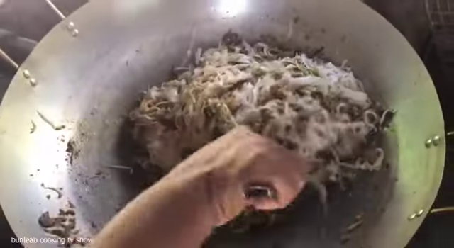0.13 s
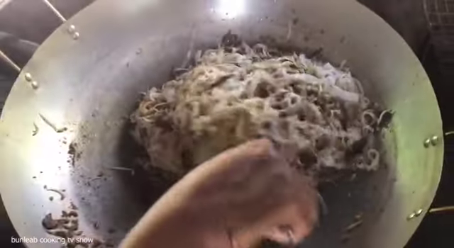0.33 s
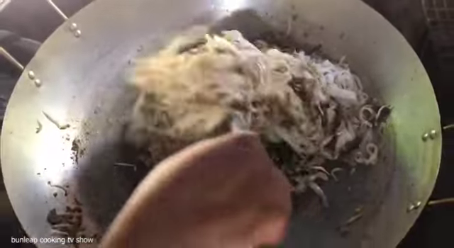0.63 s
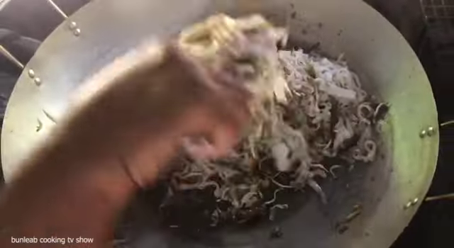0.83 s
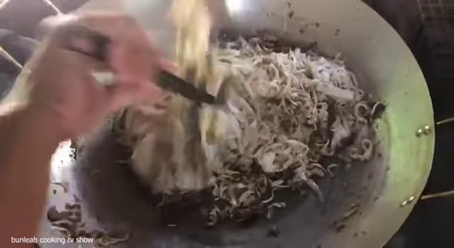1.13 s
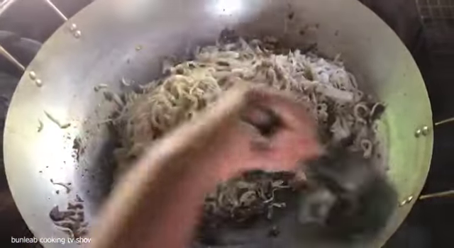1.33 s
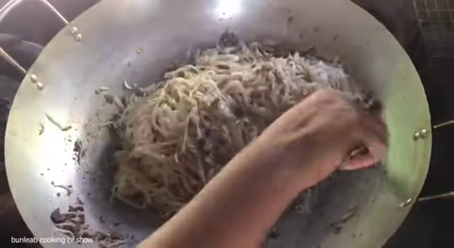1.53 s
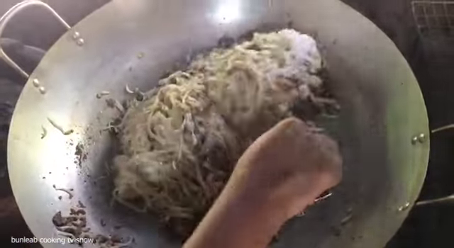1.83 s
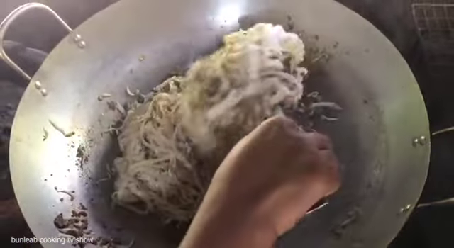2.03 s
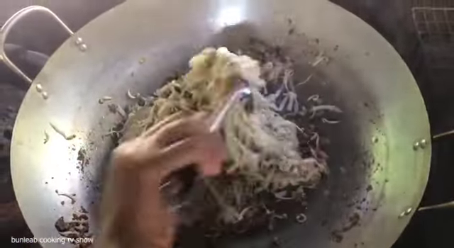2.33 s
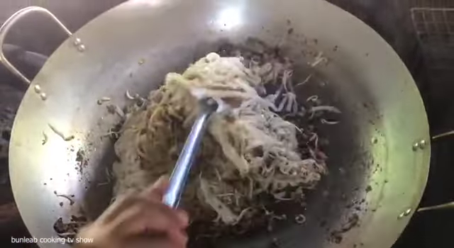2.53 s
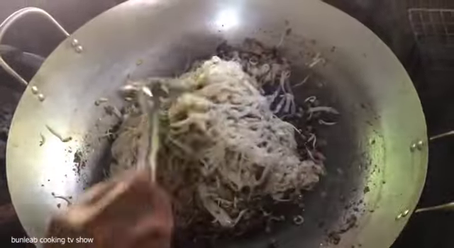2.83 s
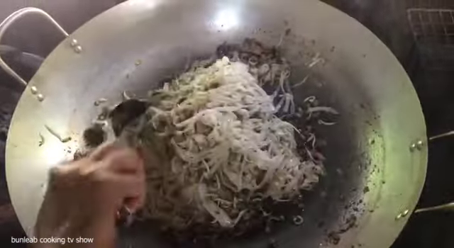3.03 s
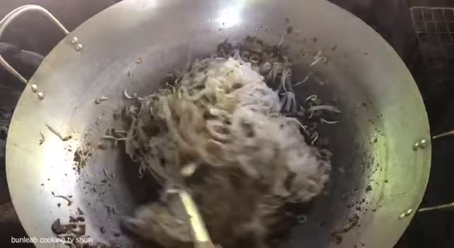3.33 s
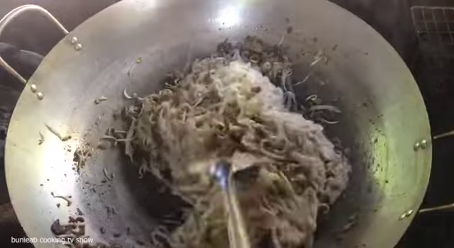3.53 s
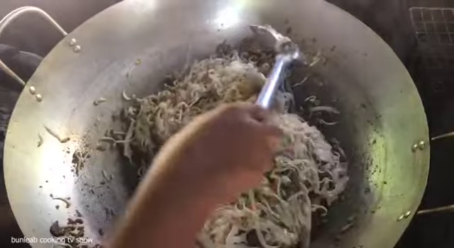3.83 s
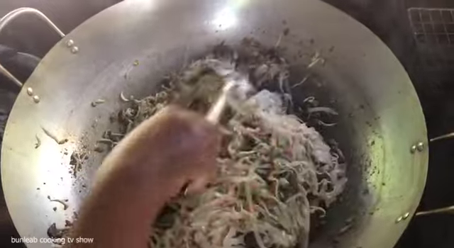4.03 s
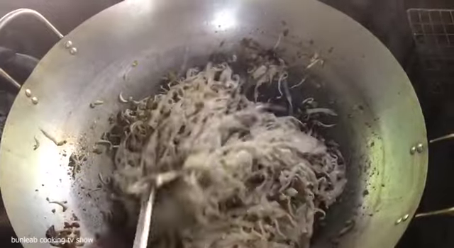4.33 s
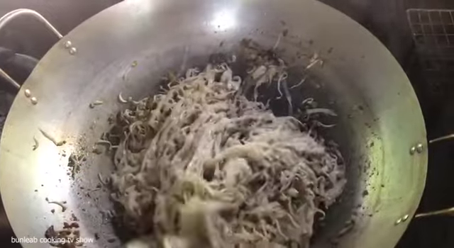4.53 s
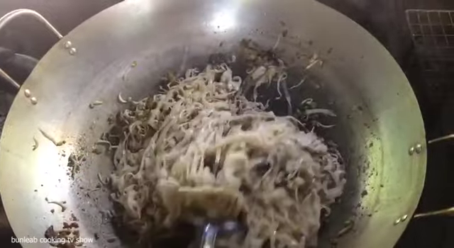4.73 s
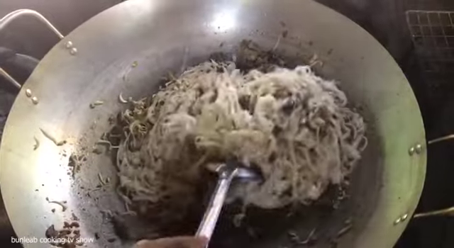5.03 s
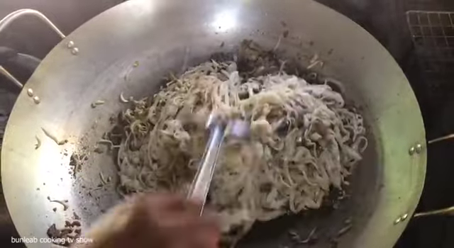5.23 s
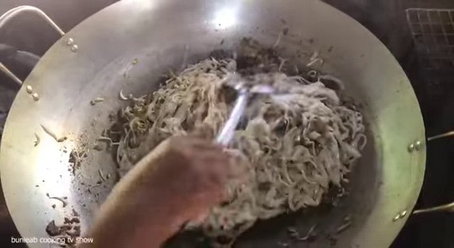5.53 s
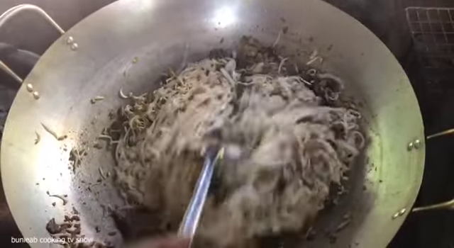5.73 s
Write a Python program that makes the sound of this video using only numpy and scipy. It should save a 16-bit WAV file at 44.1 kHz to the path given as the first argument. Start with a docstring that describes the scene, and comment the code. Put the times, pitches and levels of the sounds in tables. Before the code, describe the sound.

A metal spatula rasps briefly over a wok, noodles flop, and the wet frying swells with each turn. A sharp snag, groaning bowl and squealing scrape come next, later two loud, quickly damped clanks, the strongest sizzle surge just after the first. Then only sizzling and rustling remain. Faint burner rumble, fat ticks and four thin falling peeps lie behind; close, dry, mono, slightly dull at the top.

```python
"""Frying in a large metal wok

Noodles and minced meat sizzle (shaped noise and ringing steam bubbles) over a softly rumbling burner.
A metal spatula scrapes (stick-slip clicks through resonances), squeals (rough tones), snags on its edge
and clanks on the bowl (decaying modes); turned noodles rustle, flop back and hiss up on the hot metal.
Four faint falling peeps, like a small bird's, are gliding tones with flutter. The sound is mono."""
import sys
import numpy as np
from scipy import signal
from scipy.fft import rfft, irfft
from scipy.io import wavfile

SR = 44100
rng = np.random.default_rng(int(sys.argv[2]) if len(sys.argv) > 2 else 0)


def unload_audio(sound):
    """Save the sound as a 16-bit wav file, at the path given as the first command line argument."""
    columns = np.transpose(np.atleast_2d(sound))
    # keep every value between -1 and 1, then stretch to whole-number steps
    steps = np.round(np.clip(columns, -1, 1) * 32767)
    wavfile.write(sys.argv[1], SR, steps.astype(np.int16))


N = 260190
T = np.arange(N) / SR   # time in seconds

# spectrum of fat and water hissing on bare metal: frequency_hz, level_db
FINE_HISS_SPECTRUM = [(900, -6.5), (2500, -11), (5000, 0.5), (6300, 1.5), (7700, -1), (9400, 1),
                      (10400, -1.5), (11500, -2.5)]


def frying(wet_swell, fine_swell):
    """Bubble acoustics: wet bubbling under the heap and fine hiss on bare metal swell at each turn."""
    # spectrum of the wet bubbling: frequency_hz, level_db
    wet_spectrum = [(120, -22), (300, -4), (480, -11), (780, -4), (1050, -3.5), (1300, -1), (1900, -3),
                    (2300, -2), (3200, -3), (4300, -6), (5200, -13.5), (12000, -21.5)]
    # modes of the metal bowl that colour the bubbling: frequency_hz, width_hz, level_db
    bowl_modes = [(684, 30, 0), (813, 60, -13.5), (1205, 75, -5), (1327, 56, -6.5), (1440, 37, -9.5),
                  (1650, 79, -3.5), (1825, 30, -0.5)]
    # steady frying between the turns: time_s, wet_level_db, fine_level_db
    simmer = [(0, -40, -47.5), (.5, -44, -47.5), (1.8, -41.5, -47), (2.6, -39, -45), (3.4, -42.5, -44),
              (3.8, -41, -53), (4.1, -43.5, -52), (5.9, -45.5, -52.5)]
    # independent sounds add in power
    wet_gain, fine_gain = np.hypot(gains(simmer), [wet_swell, fine_swell])

    bubbles = fizz(723, 7800, per_s=3500, spread_db=2.5, cycles=2.6)
    bubbling = rng.standard_normal(N) + from_db(-5) * bubbles
    hollow = sum(from_db(db) * resonate(bubbling, hz, width) for hz, width, db in bowl_modes)
    wet_flicker = from_db(.5 * drift(45))
    wet = coloured(bubbling + from_db(-4.5) * hollow, wet_spectrum) * wet_flicker

    crackle = rms_one(grains(per_s=2500, spread_db=3.5))
    hiss = rng.standard_normal(N) + from_db(-4) * crackle
    fine_flicker = from_db(1.2 * drift(60))
    fine = coloured(hiss, FINE_HISS_SPECTRUM) * fine_flicker
    return wet_gain * wet + from_db(2.5) * fine_gain * fine


def fizz(low_hz, high_hz, per_s, spread_db, cycles):
    """Damped resonance: tiny steam bubbles burst, each ringing a few cycles at one of twelve pitches."""
    pitches = np.geomspace(low_hz, high_hz, num=12)
    rate = per_s / len(pitches)
    return rms_one(sum(resonate(grains(rate, spread_db), hz, hz / cycles) for hz in pitches))


def turning():
    """Boiling off: a turn lays wet noodles on hot metal; gains of wet sizzle, fine hiss and rustle."""
    # turns of the spatula: start_s, rise_s, settle_s, wet_level_db, fine_level_db, rustle_level_db
    turns = [(.76, 0.21, .35, -68, -44, -68), (1.08, 0.13, 0.11, -45.5, -43, -49),
             (1.9, .13, 0.11, -45.5, -49, -66), (3.17, 0.15, 0.16, -31, -45, -56),
             (3.5, 0.12, 0.1, -44, -45.5, -64), (4.11, 0.1, 0.48, -38, -57, -49),
             (4.6, 0.24, 0.36, -39.5, -42, -51), (5.53, .15, 0.21, -40, -45.5, -63),
             (5.7, 0.085, 0.082, -40, -53, -68)]
    settle_shape = 1.24   # above 1: a swell holds a while before the water is gone
    power = 0
    for s, rise, settle, *levels_db in turns:
        since_peak = np.maximum(T - s - rise, 0)
        swell = ease((T - s) / rise) * np.exp(-(since_peak / settle) ** settle_shape)
        power = power + np.outer(from_db(levels_db), swell) ** 2
    return np.sqrt(power)


def spits():
    """Impulsive vaporisation: larger drops of water burst in the fat with a dry, quickly decaying tick."""
    # bursts of spitting fat: time_s, relative_level_db
    bursts = [(0.266, -25), (1.0356, -22), (2.3376, -23), (2.387, -20), (2.562, -21), (2.9773, -20),
              (3.201, -16.5)]
    out, t = np.zeros(N), T[:SR // 20]
    for s, db in bursts:
        burst = coloured(rng.standard_normal(len(t)), FINE_HISS_SPECTRUM) * dying(t, 0.012)
        add(out, s, from_db(db - 10.5) * burst)
    return out


def slithering(push):
    """Soft friction: noodles slide and tumble over the metal with a low, lumpy rustle."""
    # spectrum of the rustle: frequency_hz, level_db
    rustle_spectrum = [(60, -20), (120, -13), (155, 7), (190, -15), (250, 3.5), (340, -12), (450, -17),
                       (800, -8), (1400, -24)]
    return push * coloured(grains(per_s=440, spread_db=-0.5), rustle_spectrum)


def flops():
    """Soft impact: a clump lands with a dull, heavily damped bump of two or three cycles."""
    # noodles flopping back: time_s, envelope_peak_db, pitch_hz
    landings = [(0.6706, -29, 290), (0.764, -31.5, 352), (4.965, -30.5, 282)]
    peak_s = 0.0026   # from touch to the top of the envelope
    out, t = np.zeros(N), T[:SR // 10]
    swell = (t / peak_s) ** 2 * np.exp(2 - 2 * t / peak_s)
    for s, db, hz in landings:
        add(out, s, from_db(db) * swell * np.sin(2 * np.pi * hz * t))
    return out


def scraping():
    """Stick-slip friction: the blade moves in uneven bursts, which rasp through its edge and the bowl."""
    # scraping strokes: start_s, end_s, tips_flat_s, edge_level_db, flat_bowl_level_db, flat_edge_loss_db
    strokes = [(0, 0.173, .113, -24.5, -35.5, 13.5), (1.386, 1.498, 1.41, -28.5, -43.5, 4.5),
               (1.504, 1.661, 1.608, -25.5, -34.5, 0.5)]
    # spectrum radiated by the blade's edge: frequency_hz, level_db
    edge_spectrum = [(60, -45), (200, -25), (350, -8), (600, -36), (1100, -16), (1600, -40), (2050, -1.5),
                     (2550, 4), (3600, 1.5), (4550, -4), (5000, -6), (7500, -10.5), (9500, -13),
                     (12000, -15)]
    # spectrum radiated by the bowl: frequency_hz, level_db
    bowl_spectrum = [(60, -40), (200, -12), (340, -5), (500, -33), (700, -21), (830, -3), (1000, -4.5),
                     (1300, 3), (1550, -2.5), (1880, 0.5), (2300, -13.5), (4200, -11.5), (5500, -43),
                     (12000, -35)]
    edge_gain, bowl_gain = sum(stroke(*row) for row in strokes)

    slips = rms_one(grains(per_s=3000, spread_db=2.0)) + from_db(-5.5) * rng.standard_normal(N)
    slips = rms_one(slips * from_db(0.98 * drift(260)))
    rasp = slips + from_db(-4) * wander(blade(slips), share=.018, rate=35)
    edge = edge_gain * coloured(rasp, edge_spectrum)
    bowl = bowl_gain * coloured(rasp, bowl_spectrum)
    return from_db(-2.0) * edge + from_db(2.0) * bowl


def stroke(start, end, flat_s, edge_db, bowl_db, edge_loss_db):
    """Contact coupling: a stroke begins on the edge and tips flat, driving the bowl; gains of both."""
    press_s, first_touch_db, lift_t60_s = 0.05, -6.5, 0.1   # the hand leans in, then lifts off
    tip_s, bowl_on_edge_db = 0.0053, -11   # the bowl is driven less while the blade is on its edge
    lean_db = first_touch_db * (1 - ease((T - start) / press_s))
    force = held(start, end, lift_t60_s) * from_db(lean_db)
    flat = (1 + np.tanh((T - flat_s) / (2 * tip_s))) / 2
    return force * from_db([edge_db - edge_loss_db * flat, bowl_db + bowl_on_edge_db * (1 - flat)])


def blade(x):
    """Modal filtering: pass a signal through the resonances of the spatula blade; rms 1."""
    # resonances of the blade: frequency_hz, width_hz, level_db
    resonances = [(1012, 41, 7.5), (1125, 75, -9.5), (1904, 67, 3.5), (2010, 41, -1.5), (2370, 31, 2.5),
                  (2550, 84, 0), (2780, 30, -11), (2995, 180, -2.5), (3374, 17, 6.5), (3550, 32, -2),
                  (3870, 29, -10), (4050, 79, -0.5), (4535, 25, 7.5), (4810, 31, -19), (5350, 89, -1),
                  (5930, 71, 1.5), (6660, 30, -2), (7420, 23, -24), (9550, 96, 3)]
    return rms_one(sum(from_db(db) * resonate(x, hz, width) for hz, width, db in resonances))


def squeals():
    """Friction locking: slips lock onto one resonance, gliding with the point of contact."""
    # squeals of the dragged blade: start_s, length_s, first_pitch_hz, last_pitch_hz, level_db
    tones = [(0, 0.057, 2430, 2090, -33.5), (.042, 0.039, 3600, 3820, -33), (1.545, 0.046, 2500, 2600, -29),
             (1.61, 0.046, 2480, 2590, -33)]
    return glides(tones, bend=1.05, rough=0.4, flutter=220)


def catches():
    """Damped impact: the edge snags for an instant; the hand and the food damp the blade quickly."""
    # snags of the edge: time_s, level_db, t60_s, extra_bass_db, extra_top_db
    snags = [(0.0344, -30.5, 0.083, 5, 14), (.06, -21, 0.049, 0, 8), (.075, -22, 0.032, -10, 2),
             (0.1217, -23, 0.042, -4, -8), (1.3914, -12, 0.044, 2, 8.5), (1.411, -15.5, 0.075, 4, 2),
             (1.434, -22.5, 0.088, 3, 3), (1.563, -31, 0.056, -5, -13), (1.658, -31, .03, -12, 11),
             (3.119, -26.5, 0.07, -1, -3)]
    # spectrum of a snag: frequency_hz, level_db
    snag_spectrum = [(120, -40), (220, 2.5), (480, -3.5), (620, -23), (850, -25), (1120, -1), (1400, -3),
                     (1750, -33), (2100, 4), (2600, 0), (4500, -1), (5200, -10), (8000, -9.5),
                     (9700, -13.5), (12000, -12.5)]
    out, t = np.zeros(N), T[:SR // 5]
    for s, db, t60, bass_db, top_db in snags:
        grit = rng.standard_normal(len(t))
        metal = coloured(grit + from_db(0.5) * blade(grit), snag_spectrum)
        metal = filtered(metal, [(500, bass_db), (1000, 0), (4000, 0), (8000, top_db)])
        add(out, s, from_db(db) * metal * dying(t, t60))
    return out


def clanks():
    """Modal decay: food and blade damp most of a blow at once; a weaker ring of the sheet metal stays."""
    # hard blows: time_s, relative_level_db, then extra level around 300 Hz, 1.1 kHz, 1.75 kHz and 8 kHz:
    # bass_db, low_mid_db, middle_db, top_db
    blows = [(3.0608, 5, -2, -1.5, -8, -3.5), (3.0657, -12.5, 6, 3, -7, -8), (3.9596, 2.5, 1, -2.5, 5.5, 0),
             (3.9629, -4.5, -3.5, 5.5, 9.5, -7), (3.968, -9, -9, 0, -2, 3.5)]
    # modes of the wok: frequency_hz, struck_level_db, ring_level_db, ring_t60_s
    modes = [(176, -17, -41, 0.15), (215, -13.5, -44, .25), (251, -10, -41, 0.61), (304, -24, -48, 0.17),
             (348, -10, -32, 0.31), (388.4, -9.5, -42.5, 0.52), (448, -31, -38, 0.2), (513, -33, -31, 0.22),
             (695, -23, -42, 0.5), (776, -50, -43, 1), (966, -26, -38, 0.51), (1004, -29, -32, 0.33),
             (1050, -45, -31, 0.3), (1142, -24.5, -33.5, 0.35), (1350, -50, -45, .5),
             (1637, -20.5, -41, 0.37), (1885, -23, -36, .2), (1970, -32, -39, 0.31), (2594, -17, -46, 0.45),
             (2610, -26, -37, 0.33), (2760, -15, -55, 0.19), (2953, -17.5, -50, .3),
             (2990, -15.5, -53, 0.21), (3050, -44, -50, .23), (3570, -41, -35.5, 0.26),
             (3890, -20.5, -50, .2), (4650, -44, -49, 0.45), (4800, -53, -55, 0.22), (5050, -46, -52, .22),
             (5950, -34, -38, 0.33)]
    # spectrum of the dense modes: frequency_hz, level_db
    wash_spectrum = [(30, -50), (110, -21), (200, 1.5), (420, 1), (600, -1), (1100, -5.5), (1400, -8.5),
                     (1800, -3), (2230, -16), (2800, 2.5), (3700, -15.5), (4500, -3.5), (5200, -12.5),
                     (9500, -16), (12000, -24)]
    # spectrum of the contact tick: frequency_hz, level_db
    tick_spectrum = [(1500, -22), (3000, 8), (5500, -17), (9500, 7), (11500, 1), (13000, -33)]
    damped_t60, wash_t60 = 0.041, 0.35   # seconds
    wash_db, wash_tail_db, tick_db = -10.5, -14.5, -8.0
    out, t = np.zeros(N), T[:SR // 2]
    damped = dying(t, damped_t60)
    for s, db, bass_db, low_mid_db, middle_db, top_db in blows:
        # the place of contact decides which modes are driven
        contact = [(450, bass_db), (1100, low_mid_db), (1750, middle_db),
                   (2400, 0), (4000, 0), (8000, top_db)]
        blow = np.zeros(len(t))
        for k, (hz, struck_db, ring_db, t60) in enumerate(modes):
            # the blade's load detunes each mode a little
            loaded_hz = hz * (1 + 0.0038 * rng.standard_normal())
            swing = np.sin(2 * np.pi * loaded_hz * t) * (-1) ** k
            # a mode takes about a cycle to build up
            build_up = 1 - np.exp(-t * hz * 2.0)
            envelope = (from_db(struck_db) * damped + from_db(ring_db) * dying(t, t60)) * build_up
            blow += from_db(at_hz(contact, hz) + rng.normal(0, 1)) * swing * envelope
        # countless close modes merge into a noisy wash
        wash = filtered(coloured(rng.standard_normal(len(t)), wash_spectrum), contact)
        blow += from_db(wash_db) * wash * (damped + from_db(wash_tail_db) * dying(t, wash_t60))
        tick = coloured(rng.standard_normal(len(t)), tick_spectrum) * dying(t, 0.0052)
        blow += from_db(tick_db + top_db) * tick
        add(out, s, from_db(db - 2.1) * blow)
    return out


def groan():
    """Forced vibration: knocked, then pressed by the blade, the bowl groans upward and rings out."""
    start_s, end_s, climb_s, t60 = 1.393, 1.485, .066, .18
    low_hz, high_hz = 215, 374
    knock_db, pressed_db = -31.5, -36.5
    climb = ease((T - start_s) / climb_s)
    gain = from_db(knock_db + (pressed_db - knock_db) * climb) * held(start_s, end_s, t60)
    return gain * rough_tone(low_hz + (high_hz - low_hz) * climb, rough=0.54, flutter=120)


def peeps():
    """Frequency glide: a thin, unsteady whistle starts high, then slides down by about an octave."""
    # falling peeps: start_s, length_s, first_pitch_hz, last_pitch_hz, level_db
    calls = [(1.707, 0.15, 5900, 3360, -49), (1.998, 0.091, 6160, 3340, -44.5),
             (4.72, 0.14, 6000, 3170, -50), (5.055, 0.11, 6120, 2780, -47.5)]
    return glides(calls, bend=1.0, rough=1.1, flutter=300)


def burner():
    """Combustion noise: random noise confined mostly to the bass gives the flame's steady rumble."""
    # spectrum of the burner: frequency_hz, level_db
    rumble_spectrum = [(20, -30), (35, -5.5), (54, 0), (75, -4.5), (100, -2), (150, -9.5), (250, -14.5),
                       (450, -20.5), (900, -30.5)]
    return from_db(-51) * coloured(rng.standard_normal(N), rumble_spectrum)


def glides(rows, bend, rough, flutter):
    """Frequency sweep: short tones swell, slide in pitch and fade; a larger bend delays the slide."""
    out = np.zeros(N)
    for s, length, first_hz, last_hz, db in rows:
        along = np.linspace(0, 1, int(length * SR))
        hz = first_hz + (last_hz - first_hz) * ease(along ** bend)
        envelope = np.sqrt(np.abs(np.sin(np.pi * along)))
        add(out, s, from_db(db) * envelope * rough_tone(hz, rough, flutter))
    return out


def rough_tone(hz, rough, flutter):
    """Random modulation: a gliding tone whose height and phase flutter; rms about 1."""
    blur = (drift(flutter) + 1j * drift(flutter))[:len(hz)]
    carrier = np.exp(2j * np.pi * np.cumsum(hz) / SR)
    return np.real((1 + rough * blur) * carrier) / np.sqrt(.5 + rough ** 2)


def wander(x, share, rate):
    """Time warping: resonances shift a little as the point of contact moves."""
    return np.interp(T + share / rate * drift(rate), T, x)


def resonate(x, hz, width):
    """Second-order resonance: a band of the given width in Hz with gain 1 on top."""
    r = np.exp(-np.pi * width / SR)
    zeros = np.array([1, 0, -1]) * (1 - r * r) / 2
    poles = [1, -2 * r * np.cos(2 * np.pi * hz / SR), r * r]
    return signal.lfilter(zeros, poles, x + 1e-18)


def grains(per_s, spread_db):
    """Poisson-like impulses: random clicks of uneven size and sign."""
    sizes = from_db(spread_db * np.minimum(rng.exponential(1, N), 4)) * rng.choice([-1, 1], N)
    return sizes * (rng.random(N) < per_s / SR)


def drift(rate):
    """Random modulation: chance values, rate of them a second, joined by lines; rms 1."""
    knots = rng.standard_normal(int(N / SR * rate) + 2)
    return rms_one(np.interp(T * rate, np.arange(len(knots)), knots))


def coloured(x, spectrum):
    """Spectral shaping: give a steady signal a spectrum; rms 1."""
    return rms_one(filtered(x, spectrum))


def filtered(x, spectrum):
    """Linear filtering: apply a spectrum of gains in the frequency domain."""
    hz = np.arange(len(x) // 2 + 1) * SR / len(x)
    return irfft(rfft(x) * from_db(at_hz(spectrum, hz)), len(x))


def at_hz(points, hz):
    """Logarithmic pitch: read a spectrum in dB on a log-frequency axis."""
    known, level = np.transpose(points)
    return np.interp(np.log(hz + 1e-9), np.log(known), level)


def gains(rows):
    """Level curves: each dB column as a gain in time, silent outside the curve."""
    s, *columns = np.transpose(rows)
    return [from_db(np.interp(T, s, c)) * (T >= s[0]) * (T <= s[-1]) for c in columns]


def held(start, end, t60):
    """Sustain and release: full from start to end, then dying away."""
    return (T >= start) * dying(np.maximum(T - end, 0), t60)


def dying(t, t60):
    """Exponential damping: decay by 60 dB in t60 seconds."""
    return np.exp(-np.log(1000) * t / t60)


def ease(along):
    """Raised-cosine transition: a smooth step from 0 to 1."""
    return np.sin(np.pi / 2 * np.clip(along, 0, 1)) ** 2


def from_db(db):
    """Logarithmic level: decibels to amplitude gain."""
    return 10 ** (np.asarray(db) / 20)


def rms_one(x):
    """Effective value: scale to rms 1."""
    return x / np.sqrt(np.mean(x ** 2) + 1e-20)


def add(track, s, sound):
    """Superposition: mix a sound in at time s in seconds."""
    at = max(int(s * SR), 0)
    track[at:at + len(sound)] += sound[:N - at]


def scene():
    """Superposition: all sources add at one microphone above the wok."""
    wet_swell, fine_swell, push = turning()
    food = frying(wet_swell, fine_swell) + spits() + slithering(push) + flops()
    spatula = scraping() + squeals() + catches() + clanks() + groan()
    mono = food + spatula + peeps() + burner()
    return np.array([mono, mono])


def record(dry):
    """Band limiting and saturation: deepest bass lost, loudest peaks softly overloaded, top cut."""
    low_cut_hz, ceiling, cutoff_hz = 35, .9, 11900
    high_pass = signal.butter(2, low_cut_hz, "high", fs=SR, output="sos")
    lean = signal.sosfilt(high_pass, dry)
    rounded = lean / (1 + (lean / ceiling) ** 6) ** (1 / 6)
    low_pass = signal.ellip(10, .2, 80, cutoff_hz, fs=SR, output="sos")
    return signal.sosfilt(low_pass, rounded)


dry = scene()
out = record(dry)
unload_audio(out)
```